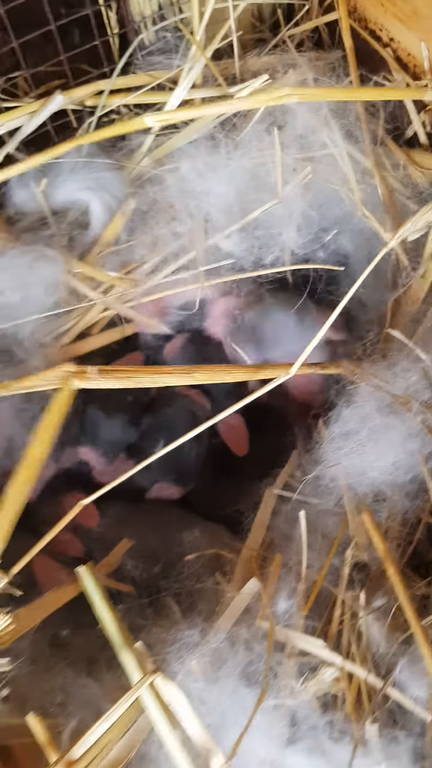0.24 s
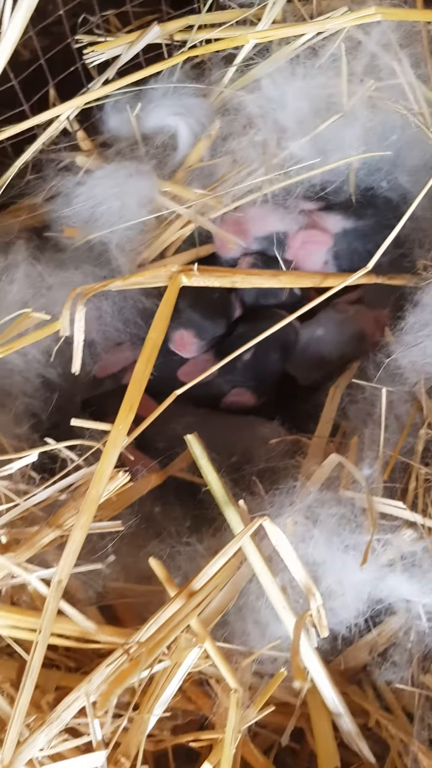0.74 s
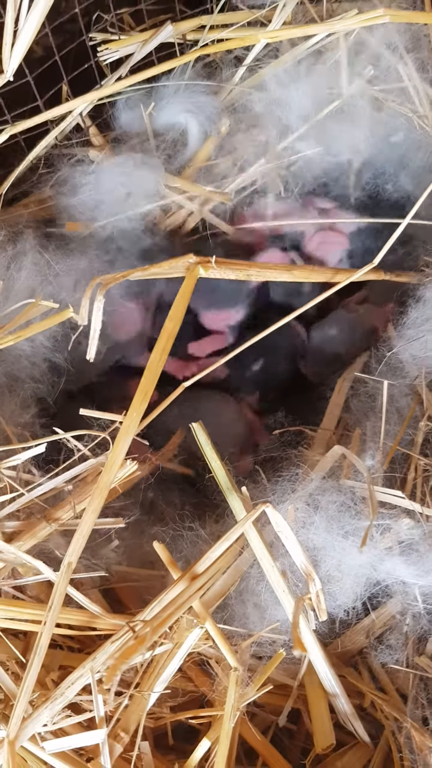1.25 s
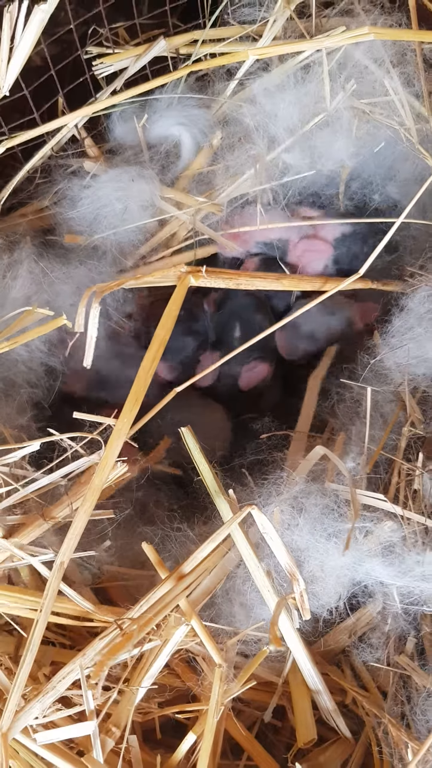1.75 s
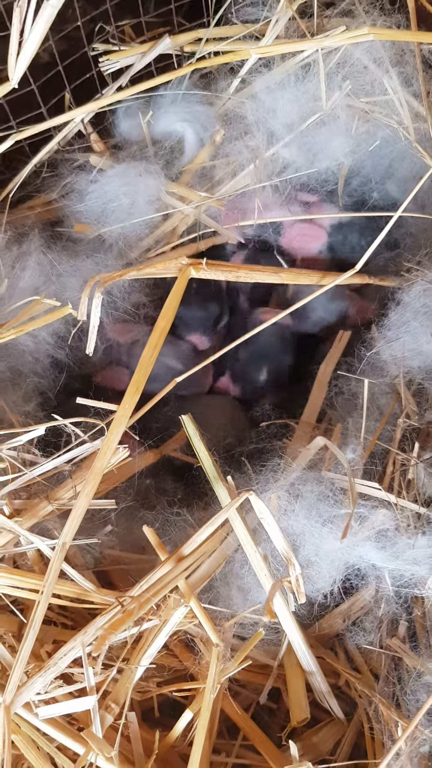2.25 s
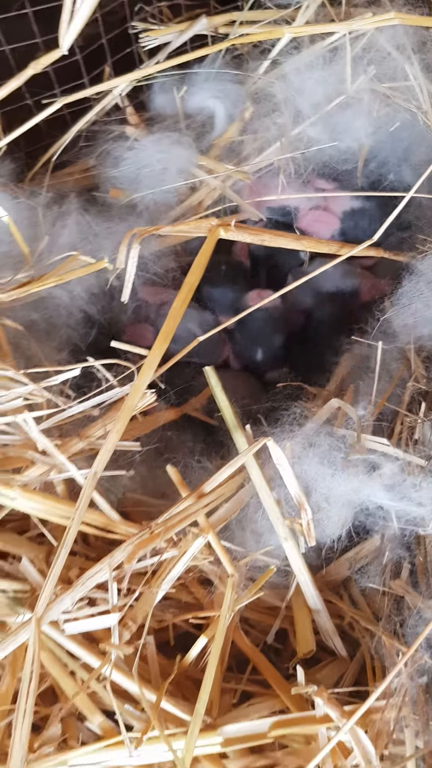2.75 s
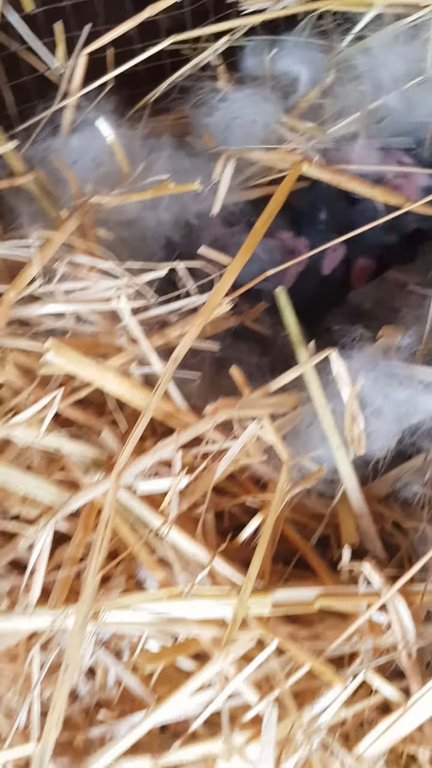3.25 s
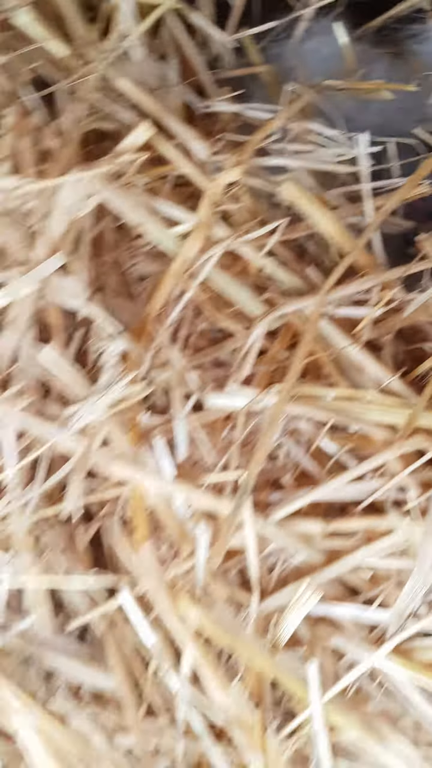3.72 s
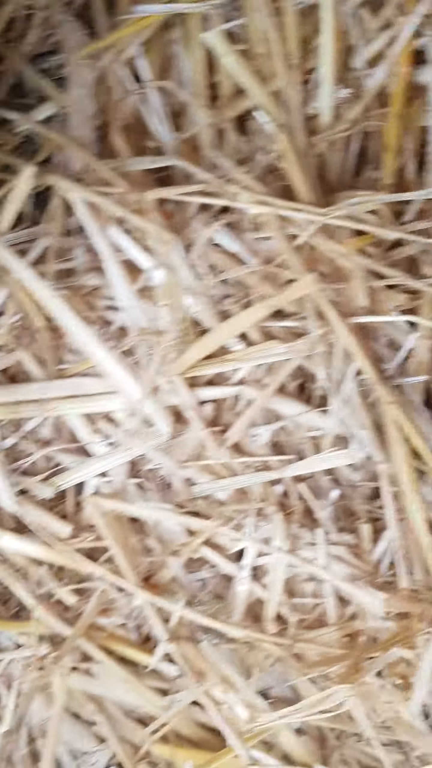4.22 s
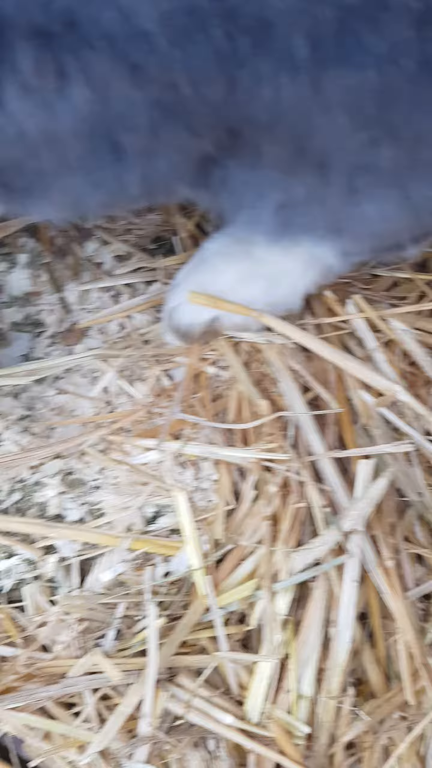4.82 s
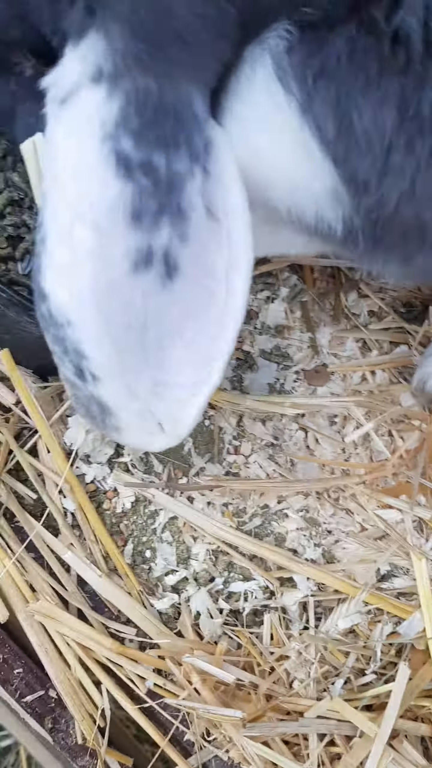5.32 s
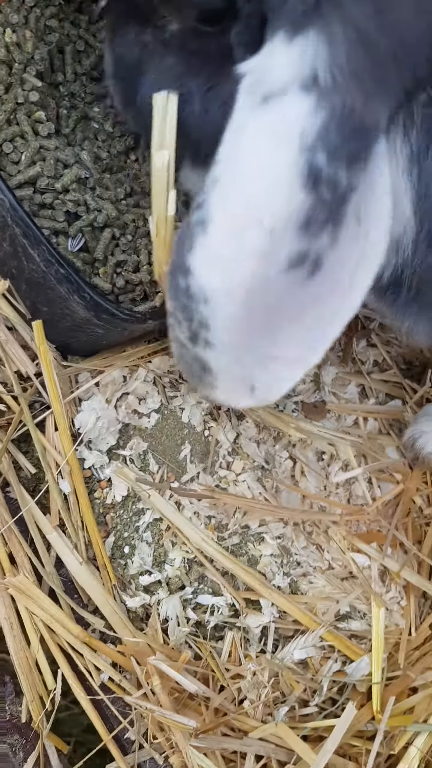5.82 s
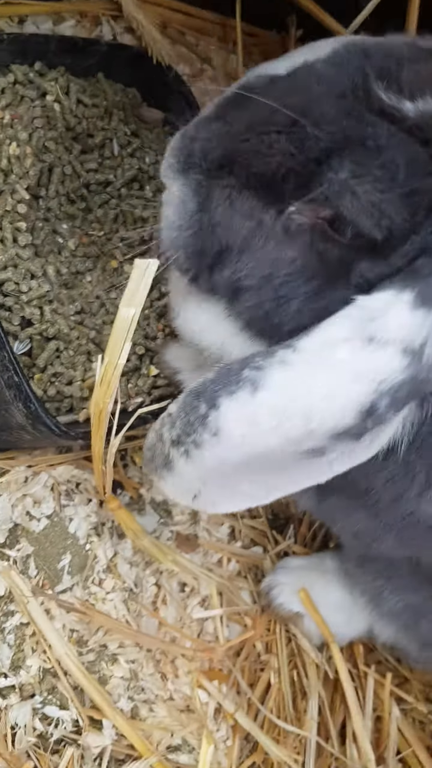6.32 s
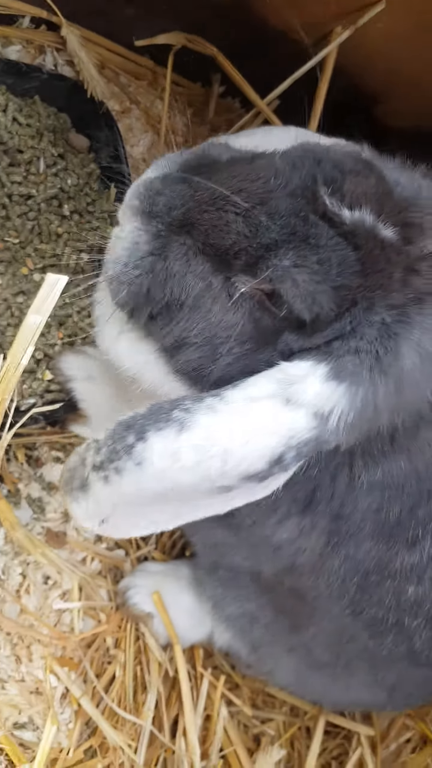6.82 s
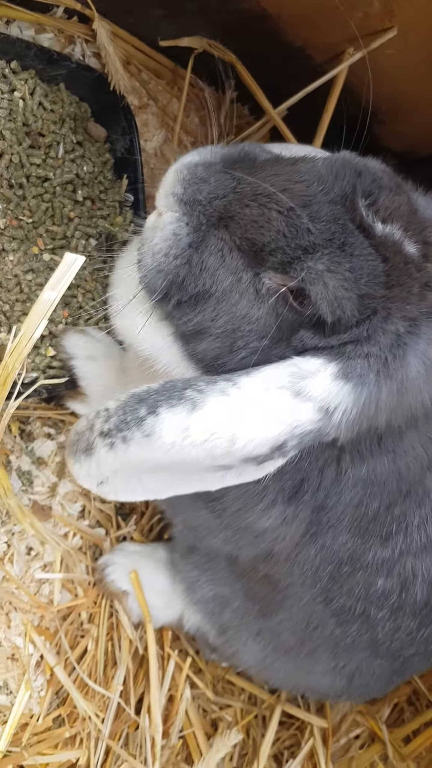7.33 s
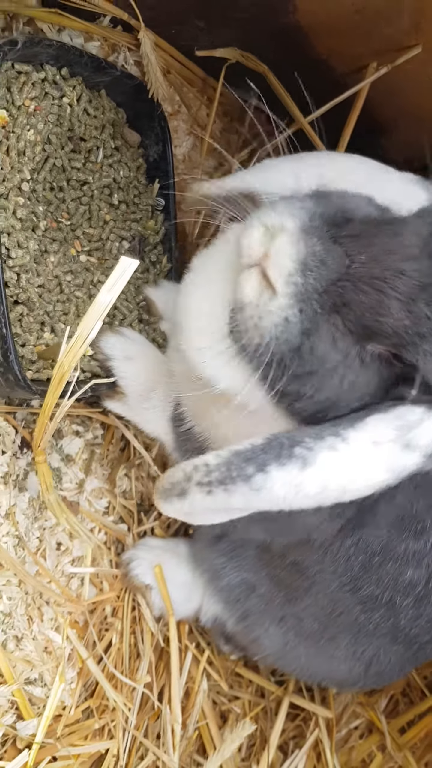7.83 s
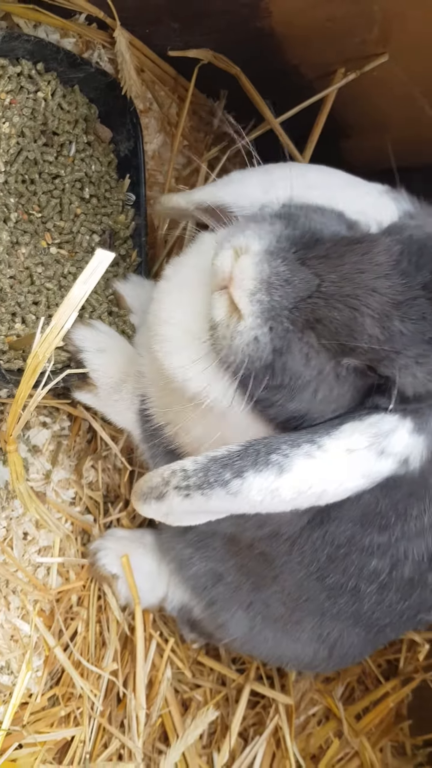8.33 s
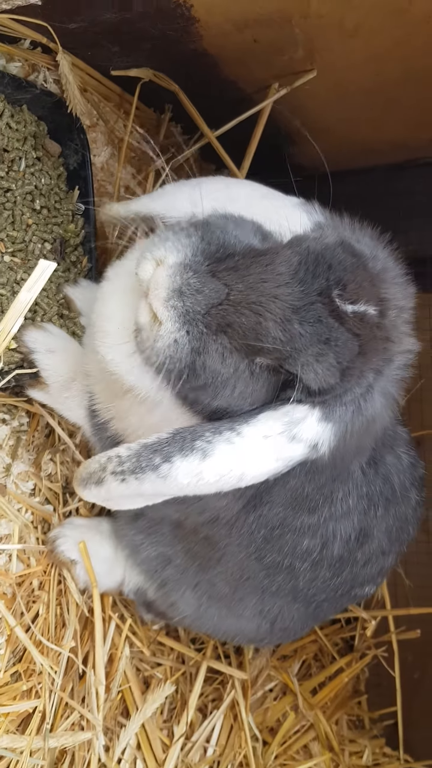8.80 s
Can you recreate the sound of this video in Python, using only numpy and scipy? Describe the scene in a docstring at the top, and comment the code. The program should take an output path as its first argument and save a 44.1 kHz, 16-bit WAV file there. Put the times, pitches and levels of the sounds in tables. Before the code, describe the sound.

Outdoors by a wooden hutch, a hen whines and croons hoarsely a little way off, between soft clucks. Dry straw slides and snaps close to the microphone, and the boards give a few dull bumps and scuffs. Then a nearer hen draws out one long, cracking call followed by five short ones. Faint clucks and scuffs end it, over a low rumble.

```python
"""Hens call round a straw-filled rabbit hutch outdoors, over a low rumble. First one whines and croons
a little way off, between soft clucks. Then straw slides and snaps, and the hutch boards ring dully
with bumps and scuffs. After five seconds a nearer hen draws out a long breaking call and five short
ones; faint clucks and scuffs close the scene. Each voice is a syrinx tone with overtones coloured by
the throat, roughened by puffs of turbulent breath."""
import sys
import numpy as np
from scipy import signal
from scipy.io import wavfile

SR = 44100
rng = np.random.default_rng(int(sys.argv[2]) if len(sys.argv) > 2 else 0)


def master(y):
    """Save y as 16-bit WAV."""
    cut = np.clip(np.atleast_2d(y).T, -1, 1)
    pcm = np.round(cut * 32767)  # scale
    wavfile.write(sys.argv[1], SR, pcm.astype(np.int16))


N = 399546
TIME = np.arange(N) / SR

# the near hen's long call, swelling and opening: (time [s], pitch [Hz], fundamental [dB], octave [dB])
NEAR_LONG_CALL = [(5.235, 601, -48, -56), (5.257, 565.4, -45.5, -38), (5.285, 498, -45, -51),
                  (5.32, 614, -43, -48), (5.4, 590, -35, -47), (5.6, 629, -36, -36.5),
                  (5.75, 640, -35.5, -35.5), (5.9, 641, -32, -32), (6.08, 646.6, -34.5, -32.5),
                  (6.12, 661, -34.5, -28), (6.34, 674.4, -32, -24.5), (6.378, 581, -52, -42)]
# her short calls: (start [s], length [s], pitch [Hz], fundamental [dB], octave [dB],
# octave swell [dB/s], overshoot [Hz], final flick [Hz])
NEAR_SHORT_CALLS = [(6.486, .21, 648, -36.5, -30, 28, 3.9, 24.6),
                    (6.818, 0.2, 613.6, -36, -33.5, 18, 17, 85),
                    (7.143, 0.18, 597, -35.5, -31.5, 11, 17.6, 85),
                    (7.449, 0.178, 601, -36.5, -31, 2, 22.2, 42),
                    (7.77, 0.19, 608.3, -39.5, -33, 24, 30, 31.6)]
# her voice cracks into a higher register:
# (centre [s], length [s], rise [share of pitch], fundamental change [dB], octave change [dB])
REGISTER_CRACKS = [(5.373, 0.033, 0.35, -15, -10), (5.431, 0.017, 0.31, -17, -3),
                   (5.487, 0.021, 0.1, -1, 1), (5.541, 0.027, 0.21, -11, -4), (5.67, 0.019, 0.13, -2, 1),
                   (5.72, 0.0081, 0.13, 2, 2), (5.785, 0.012, 0.17, -4.5, -3), (5.824, 0.03, .145, -1.5, 3),
                   (5.87, 0.04, 0.15, -5, 6.5), (5.933, 0.023, .14, -6, -1.5),
                   (6.034, 0.01477, 0.128, -3, 2), (6.357, 0.009, 0.25, 3, -4.5),
                   (6.517, 0.0089, 0.11, 1.5, 0), (6.628, 0.0027, 0.13, -6.5, -2),
                   (6.934, 0.011, 0.12, -3, 0.5)]
# she bears down in pushes: (centre [s], length [s], strength [factor])
VOICE_PRESSES = [(5.908, 0.0347, 1.52), (5.959, 0.028, 0.56), (6.004, 0.051, 1.71), (6.065, 0.0494, 0.9),
                 (6.145, 0.05, 0.45), (6.536, 0.042, 0.77), (6.654, 0.022, 0.58), (6.672, 0.018, 1.77),
                 (6.847, 0.025, 1), (6.982, 0.044, 1.24), (7.189, 0.029, 1.13), (7.3, 0.034, 0.53),
                 (7.516, 0.044, 1.3), (7.579, 0.039, 0.92), (7.784, 0.018, 1.4), (7.837, 0.036, 0.85),
                 (7.918, 0.053, 0.54)]
# her pitch flutters: (centre [s], length [s])
PITCH_FLUTTERS = [(5.76, 0.18), (6.255, 0.087), (6.587, 0.018)]
# she is hoarse until she finds her register: (time [s], extra rasp [dB])
NEAR_HOARSENESS = [(5.3, 5), (5.55, 10), (5.78, 10), (5.89, -2.5), (6.3, 2), (7.3, 2.5), (7.8, 4)]
# hoarse croons: (start [s], length [s], pitch [Hz], fundamental [dB], octave [dB])
HOARSE_CROONS = [(0.45, 0.17, 641, -46.5, -54.5), (0.695, 0.19, 678.5, -44.5, -53),
                 (1.007, .192, 662.5, -44, -53.5), (1.395, 0.24, 682, -43.5, -51.5)]
# thin whines and squeaks, one curve a call: (time [s], pitch [Hz], fundamental [dB], octave [dB])
THIN_WHINES = [
    [(0, 867, -41.5, -45), (.035, 886, -44.5, -49), (.06, 1007, -56, -55), (.09, 980, -53, -70)],
    [(.19, 936, -52, -59), (.255, 999, -50, -60), (.277, 767, -52, -42), (.304, 703, -36, -41.5),
     (.318, 790, -74, -40), (.335, 744, -55, -81)],
    [(.445, 1150, -53, -70), (.475, 1071, -55, -81), (.495, 940, -56, -48), (.53, 722, -46, -57)],
    [(.568, 796, -62, -52), (.583, 736, -44, -45.5), (.6, 765, -67, -70)],
    [(1.922, 596, -76, -52), (1.95, 635, -72, -39.5), (1.972, 653, -64, -57), (1.995, 631, -73, -42.5),
     (2.08, 648, -69, -39.5), (2.16, 621.5, -61, -36), (2.2, 612, -52, -43.5), (2.212, 599, -46, -50),
     (2.228, 589, -52, -36), (2.27, 572, -50, -41), (2.285, 547, -68, -54)],
]
# soft clucks: (start [s], length [s], pitch [Hz], glide [Hz], fundamental [dB], octave [dB])
SOFT_CLUCKS = [(0.163, 0.034, 649, 3, -35.5, -52), (1.222, 0.041, 647, -64, -57.5, -69),
               (1.959, 0.045, 678, -35, -51.5, -54.5), (2.315, 0.02, 664, -30, -52, -69),
               (3.181, 0.035, 810, 105, -45, -69), (3.23, 0.031, 798, -250, -63, -60),
               (8.292, 0.036, 607, 63, -55.5, -70), (8.331, .04, 579, -43, -53, -66),
               (8.701, 0.054, 708, 0, -55, -76), (8.901, 0.055, 560, 115, -55, -69),
               (8.951, 0.068, 692, -85, -54, -72)]
# throat colour of each voice: (frequency [Hz], overtone level against the tone's body [dB])
NEAR_OVERTONES = [(1300, -9.5), (1850, -13.5), (2100, -18), (2350, -31.5), (2650, -28), (3100, -34),
                  (3500, -41.5), (3900, -26.5), (4400, -42), (5600, -51.5), (6500, -44), (8000, -77)]
CROON_OVERTONES = [(1300, -30), (1750, -1.5), (2020, -9), (2300, -42), (3000, -28), (4100, -34),
                   (6000, -45)]
WHINE_OVERTONES = [(1300, -10), (1850, -34), (2400, -27), (2800, -38), (4200, -49), (6000, -60)]
# where each voice stands: (time [s], left lag [ms], left over right at the octave [dB])
NEAR_PAN = [(5.3, 0.37, -1.5), (6.03, 0.32, -3.5), (6.3, 0.28, -6.5), (6.6, 0.21, -7), (6.9, 0.19, -4.5),
            (7.55, 0.12, -4.5), (7.9, 0.11, -5)]
CROON_PAN = [(.5, -0.24, -2), (1.6, -0.2, -0.5)]
WHINE_PAN = [(0, 0.11, 0), (.3, 0.11, -2), (2.03, 0.27, 10), (2.16, 0.35, -5), (2.24, 0.15, -3)]
# straw is stirred: (start [s], length [s], crisp treble [dB], duller rustle [dB])
STRAW_STIRS = [(0, 0.072, -42, -46), (0.06, 0.022, -40, -45), (.17, 0.13, -49.5, -54.5),
               (0.35, 0.16, -58.5, -63), (0.81, 0.028, -59.5, -61.5), (1.145, 0.11, -54, -61),
               (1.334, 0.48, -60, -63.5), (1.73, 0.054, -64, -65), (2.023, 0.27, -63, -66.5),
               (2.846, 0.52, -52, -55.5), (3.528, 0.072, -50.5, -45.5), (3.645, 0.042, -42, -45.5),
               (3.784, 0.15, -51.5, -52.5), (3.98, 0.51, -64, -63.5), (4.314, 0.4, -57, -57),
               (4.763, 0.41, -59, -60), (5.305, 0.49, -52, -51), (5.893, 0.021, -56, -53),
               (6.215, 0.053, -59, -53), (6.76, 0.26, -71, -64.5), (7.246, 0.096, -67, -60),
               (7.472, 0.3, -66, -60.5), (7.846, 0.21, -60, -57), (8.102, 0.05, -70, -67),
               (8.537, 0.33, -63, -64), (8.818, 0.13, -60, -58)]
# the straw's two colours: (frequency [Hz], relative density [dB])
CRISP_SPECTRUM = [(5000, -15), (7500, -11.5), (9000, -8), (12000, 0.5), (16000, -4.5)]
RUSTLE_SPECTRUM = [(1200, 2), (2200, 1), (3300, -4), (4500, -1), (7000, -1), (8500, -23.5), (11000, -28.5)]
# single stalks snap: (time [s], treble before trim [dB], middle band before trim [dB], decay [s])
STALK_SNAPS = [(0.078, -24, -41, 0.039), (0.144, -36, -59, .005), (0.164, -32, -44, 0.0046),
               (0.255, -36, -50, 0.0051), (0.823, -29, -52, .004), (1.166, -34.5, -60, 0.0035),
               (1.216, -32.5, -51, 0.015), (1.609, -38, -54, .003), (1.763, -28, -47, 0.0033),
               (1.846, -36, -52, 0.0022), (1.917, -40, -61, 0.0025), (2.925, -38, -66, .003),
               (3.036, -32, -53, 0.0051), (3.216, -34, -47.5, 0.039), (3.386, -41, -43, 0.016),
               (3.403, -31, -45, 0.011), (3.527, -26, -39, 0.0091), (3.6567, -20, -35, .003),
               (3.8764, -18.5, -49, 0.0022), (3.89, -42, -59, .003), (4.605, -54, -50, 0.0038),
               (4.971, -42, -53.5, .002), (5.337, -30.5, -43.5, 0.029), (8.04, -49, -61, 0.0024),
               (8.08, -46, -60, .002), (8.191, -45, -57, 0.0018), (8.207, -52, -61, .001),
               (8.242, -55, -66, .001), (8.894, -50, -56, .003)]
# bumps and scuffs on the hutch: (start [s], length [s], resonance [Hz], level [dB])
HUTCH_BUMPS = [(0.142, 0.092, 690, -43), (1.417, 0.091, 338, -48), (2.954, 0.058, 386, -44.5),
               (2.959, 0.053, 670, -54), (3.183, 0.017, 750, -46.5), (3.238, 0.046, 716, -46),
               (3.379, 0.053, 2060, -48.5), (3.489, 0.19, 1730, -47), (3.516, 0.21, 400, -50.5),
               (3.602, 0.063, 413, -46.5), (3.654, 0.019, 2090, -42.5), (3.654, 0.017, 1300, -44),
               (3.655, 0.034, 730, -51), (3.717, 0.086, 510, -50.5), (4.602, 0.015, 1780, -50),
               (4.603, 0.012, 504, -46), (5.128, 0.0057, 605, -48), (5.129, 0.005, 1150, -53),
               (5.3, 0.0066, 880, -44), (5.986, 0.0047, 870, -38.5), (8.661, 0.14, 504, -55),
               (8.9, 0.17, 590, -54), (8.893, 0.14, 2290, -57.5)]
# colours of the low bed and the far-off hiss: (frequency [Hz], relative density [dB])
LOW_SPECTRUM = [(22, -52), (32, -17), (41, -4), (51, 7.5), (63, -8), (82, 0), (115, -14.5), (150, -10),
                (185, -7), (240, -16), (330, -19.5), (430, -20), (650, -3)]
AIR_SPECTRUM = [(450, -4.5), (620, -7), (820, 2), (1050, 6.5), (1400, 4), (1900, -0.5), (2400, -5),
                (3100, -19), (6000, -58)]
# fader rides for rumble, drone and hiss: (time [s], level [dB])
RUMBLE_FADER = [(0, -44.5), (1.2, -44), (1.8, -45), (2.7, -45), (3.1, -42.5), (3.6, -36.5), (4.0, -47.5),
                (4.7, -44.5), (5.2, -48), (5.8, -45.5), (6.5, -44), (7.2, -49), (7.6, -46), (8.3, -51.5),
                (9.06, -43.5)]
DRONE_FADER = [(0, -52), (2.4, -53.5), (3.0, -48.5), (3.6, -45), (4.0, -48.5), (5.8, -44.5), (7.0, -48),
               (9.06, -49.5)]
AIR_FADER = [(0, -58), (1.0, -56), (2.5, -55), (3.5, -53.5), (4.5, -53.5), (6, -54.5), (7.1, -54),
             (8.3, -55.5), (9.06, -53.5)]
# stereo image of straw and background: (frequency [Hz], left-right correlation [0 to 1])
STEREO_LIKENESS = [(50, 0.96), (150, 0.99), (300, 0.8), (700, 0.0025), (1400, 0), (3000, 0.0053),
                   (15000, 0)]


def hen(calls, throat, place, half_db, half_tilt_db, jitter, shimmer_db, rasp_db, shadow_db,
        fundamental_share=0, onset_rasp_db=0, scratch=0, press_db=0, hoarseness=((0, 0),),
        edge_s=0.00057):
    """A syrinx tone with overtones; alternate cycles differ, which puts half harmonics between them."""
    smear_cycles, patchy_db, settle_s = .021, 3, .018
    out = np.zeros((2, N))
    for t, pitch, first_db, octave_db in calls:
        lag_ms, balance_db = in_time(place, t)
        pitch = pitch * (1 + jitter * drift(900, len(t)))
        cycles = np.cumsum(pitch) / SR
        left_lag_cycles = np.array([[1], [0]]) * pitch.mean() * lag_ms / 1000
        doubling_db = half_db + 3 * drift(25.1, len(t))
        body_db = octave_db + fundamental_share * (first_db - octave_db) + press_db * pressing(t)
        voice = 0
        for k in np.arange(2, 23) / 2:
            level_db = first_db if k == 1 else octave_db if k <= 2 else body_db + at_hz(throat, k * pitch)
            if k % 1:   # half harmonics tilt with height, up to a limit
                level_db = level_db + np.minimum(doubling_db + half_tilt_db * (k - 2), half_db / 3)
            # low partials come direct, delayed and shaded at the left; the top ones scatter
            direct = k < 4
            ears = panned(balance_db - shadow_db * np.log2(k / 2) if direct else balance_db / 2)
            phase = k * cycles - left_lag_cycles * (min(k, 2) if direct else 1)
            if k > 2:   # overtones lose step, and come and go
                phase = phase + smear_cycles * (k - 2) * drift(220, len(t))
                level_db = level_db + patchy_db * drift(34.28, len(t))
            shimmer_share = .6 if k == 1 else 1   # the fundamental stays firmer
            gain = from_db(level_db + shimmer_db * shimmer_share * drift(140, len(t)))
            voice = voice + np.sqrt(2) * gain * ears * np.sin(2 * np.pi * phase)
        # turbulence leaves the syrinx in puffs, one a cycle
        puffs = rng.standard_normal((2, len(t))) * (1 + np.cos(2 * np.pi * cycles))
        grit = scratch * band(puffs, 2100, 3200) + 0.045 * band(puffs, 4200, 4700)
        rasp = rms_one(band(puffs, 770, 1750, order=4) + grit)
        unsettled_db = onset_rasp_db * np.exp(-(t - t[0]) / settle_s)
        voice = voice + rasp * from_db(octave_db + rasp_db + unsettled_db + in_time(hoarseness, t)[0])
        fade = np.clip(np.minimum(t - t[0], t[-1] - t) / edge_s, 0, 1)
        add(out, t[0], voice * fade)
    return out


def glide(curve):
    """A freely gliding call: (time [s], pitch [Hz], fundamental [dB], octave [dB])."""
    t = np.arange(curve[0][0], curve[-1][0], 1 / SR)
    return (t, *in_time(curve, t))


def short_call(s, length, hz, first_db, octave_db, swell_db_per_s, overshoot_hz, flick_hz):
    """The pitch scoops up, overshoots, climbs as the octave swells, and ends on an upward flick."""
    climb_hz_per_s, wavers_per_s = 128.5, 70
    age = np.arange(0, length, 1 / SR)
    past_middle, remaining = age - length / 2, length - age
    scoop_hz = 60.4 * np.exp(-age / 0.01153)
    overshoot = overshoot_hz * np.exp(-((age - .032) / 0.0133) ** 2)
    flick = flick_hz * np.exp(-remaining / 0.0076)
    pitch = hz - scoop_hz + overshoot + climb_hz_per_s * past_middle + flick
    edges_db = -8.5 * np.exp(-age / 0.0042) - 6.5 * np.exp(-remaining / 0.006)
    swell_db = swell_db_per_s * past_middle + 1.6 * drift(wavers_per_s, len(age))
    pitch = pitch * (1 + 0.0078 * drift(wavers_per_s, len(age)))
    # the flick pushes the octave while the fundamental gives way
    first_db, octave_db = first_db - 0.14 * flick, octave_db + 0.0687 * flick
    return s + age, pitch, first_db + edges_db, octave_db + edges_db + swell_db


def cracked(t, pitch, first_db, octave_db):
    """Pressing flattens and strengthens the tone; a crack throws it upward; a flutter shakes it."""
    sag_share, push_db, flutter_share, flutter_hz = .018, 3, 0.04, 60
    press = pressing(t)
    pitch, octave_db = pitch * (1 - sag_share * press), octave_db + push_db * press
    for s, length, rise, first_change_db, octave_change_db in REGISTER_CRACKS:
        inside = during(t, s, length)
        pitch = pitch * (1 + rise * inside)
        first_db, octave_db = first_db + first_change_db * inside, octave_db + octave_change_db * inside
    shaking = sum(during(t, s, length) for s, length in PITCH_FLUTTERS)
    flutter = flutter_share * shaking * np.sin(2 * np.pi * flutter_hz * t)
    return t, pitch * (1 + flutter), first_db, octave_db


def pressing(t):
    """How hard the near hen bears down on her voice."""
    return sum(strength * during(t, s, length) for s, length, strength in VOICE_PRESSES)


def croon_call(s, length, hz, first_db, octave_db):
    """A raspy catch in the throat, joined by a soft tone that climbs; both fade together."""
    climb_hz_per_s, catch_hz, catch_db, catch_s = 299, 20.5, 9.5, 0.019
    attack_s, release_s, fade_db = 0.023, 0.024, 31
    age = np.arange(0, length, 1 / SR)
    catch = np.exp(-age / catch_s)
    pitch = hz + climb_hz_per_s * (age - length / 2) + catch_hz * catch
    attack_db = -fade_db * np.maximum(1 - age / attack_s, 0)
    release_db = -fade_db * np.maximum(1 - (length - age) / release_s, 0)
    return s + age, pitch, first_db + attack_db + release_db, octave_db + release_db + catch_db * catch


def cluck_call(s, length, hz, glide_hz, first_db, octave_db):
    """One soft gulp of tone that swells and dies while its pitch slides."""
    age = np.arange(0, length, 1 / SR)
    arch_db = -6 * (2 * age / length - 1) ** 2
    return s + age, hz + glide_hz * (age / length - .5), first_db + arch_db, octave_db + arch_db


def straw():
    """Dry stalks slide over each other in small surges."""
    crisp_db, rustle_db = stirring(TIME)
    surge_db = 1.3 * drift(45)
    grains = crackle(per_s=1100, spread_db=3.2, hiss=.75)
    crisp = from_db(crisp_db + surge_db) * coloured(CRISP_SPECTRUM, grains)
    rustle = from_db(rustle_db + surge_db) * coloured(RUSTLE_SPECTRUM, grains)
    return (crisp + rustle) * panned(-0.45)


def stirring(t):
    """Crisp and rustle levels in dB: each stir builds, holds and settles."""
    attack_s, release_s = 0.076, 0.14
    grid = TIME[::64]
    gains = from_db([[-73], [-72]])   # the straw is never quite still
    for s, length, crisp_db, rustle_db in STRAW_STIRS:
        before, after = np.maximum(s - grid, 0), np.maximum(grid - s - length, 0)
        envelope = np.exp(-before / attack_s - after / release_s)
        gains = np.maximum(gains, from_db([[crisp_db], [rustle_db]]) * envelope)
    return [np.interp(t, grid, 20 * np.log10(gain)) for gain in gains]


def crackle(per_s, spread_db, hiss):
    """Countless tiny stalk contacts of uneven size over a smooth sliding hiss."""
    contacts = rng.random((2, 1, N)) < per_s / SR
    sizes = from_db(spread_db * np.minimum(rng.exponential(1, (2, 1, N)), 4))
    ticks = rms_one(contacts * sizes * rng.standard_normal((2, 2, N)))
    return ticks + hiss * rng.standard_normal((2, 2, N))


def snaps(rise_share, splinter_s, splinter_db, treble_trim_db, middle_trim_db):
    """A stalk gives with a sharp crack or a slower crunch, then splinters briefly."""
    out, t = np.zeros((2, N)), TIME[:SR // 12]
    for s, treble_db, middle_db, decay_s in STALK_SNAPS + small_snaps(count=14, decay_s=.002):
        splinters = from_db(splinter_db + 3.8 * drift(320, len(t))) * np.exp(-t / splinter_s)
        attack = 1 - np.exp(-t / (rise_share * decay_s))
        burst = rng.standard_normal((2, len(t))) * (np.exp(-t / decay_s) + splinters) * attack
        treble = from_db(treble_db + treble_trim_db) * band(burst, 8600, 21000)
        middle = from_db(middle_db + middle_trim_db) * band(burst, 3760, 9760)
        add(out, s, treble + middle)
    return out


def small_snaps(count, decay_s):
    """Lesser snaps fall at random, louder where the straw is stirred harder."""
    s = rng.random(count) * TIME[-1]
    crisp_db, rustle_db = stirring(s)
    return list(zip(s, crisp_db + 16.5, rustle_db + 2, np.full(count, decay_s)))


def bumps(width_hz, body_db):
    """Each bump is a short run of uneven contacts that sets a damped board sounding."""
    out, t = np.zeros((2, N)), TIME[:SR // 4]
    for s, length, hz, level_db in HUTCH_BUMPS:
        push = np.clip(t / 0.0043, 0, 1) * np.clip(2 * (1 - t / length), 0, 1)
        force = push * from_db(1.5 * drift(170, len(t)))
        contacts = force * (rng.standard_normal(len(t)) + 0.8 * rng.standard_normal((2, len(t))))
        ring = resonate(resonate(contacts, hz, width_hz), hz, 2 * width_hz)
        body = from_db(body_db) * band(contacts, 310, 1930)
        add(out, s, from_db(level_db) * rms_one(ring + body) * np.sqrt(length / t[-1]))
    return out


def hutch_echo(x, t60, wet_db):
    """Dense, quickly dying reflections from the hutch walls and the yard."""
    t = TIME[:SR // 2]
    tail = band(rng.standard_normal((2, len(t))), 540, 2100) * from_db(-60 * t / t60) * (t > .004)
    tail = tail / np.sqrt(np.sum(tail ** 2, axis=1, keepdims=True))
    return x + from_db(wet_db) * signal.fftconvolve(x, tail, axes=1)[:, :N]


def outdoors():
    """The bed: a low rumble, a drone above it and a far-off hiss."""
    low = coloured(LOW_SPECTRUM, rng.standard_normal((2, 2, N)))
    hiss = coloured(AIR_SPECTRUM, rng.standard_normal((2, 2, N)))
    rumble = from_db(in_time(RUMBLE_FADER)[0]) * rms_one(band(low, 34.0, 109.7, order=4))
    drone = from_db(in_time(DRONE_FADER)[0]) * rms_one(band(low, 126.3, 371.4, order=4))
    air = from_db(in_time(AIR_FADER)[0]) * rms_one(band(hiss, 672, 2910, order=5))
    return (rumble + drone) * panned(1.8) + air * panned(.8)


def coloured(spectrum, source):
    """Two unrelated stereo sources take turns in a filter bank; the bass is centred, the top wide."""
    low, high = spectrum[0][0], spectrum[-1][0]
    edges = np.geomspace(low, high * np.sqrt(4 / 3), 2 * len(spectrum) + 1)
    out = 0
    for k, (low_hz, high_hz) in enumerate(zip(edges, edges[1:])):
        hz = np.sqrt(low_hz * high_hz)
        pair = band(source[k % 2], low_hz, high_hz)
        blend = np.arcsin(at_hz(STEREO_LIKENESS, hz)) / 2
        out = out + from_db(at_hz(spectrum, hz)) * (np.cos(blend) * pair + np.sin(blend) * pair[::-1])
    return rms_one(out)


def from_db(db):
    """Decibels to gain."""
    return 10 ** (np.asarray(db) / 20)


def rms_one(x):
    """Scale to unit power."""
    return x / np.sqrt(np.mean(x ** 2) + 1e-20)


def in_time(rows, t=TIME):
    """Each column of a curve, joined by straight lines."""
    s, *columns = np.transpose(rows)
    return [np.interp(t, s, c) for c in columns]


def at_hz(points, hz):
    """Read a spectrum on a log-frequency axis."""
    f, value = np.transpose(points)
    return np.interp(np.log(hz), np.log(f), value)


def during(t, s, length):
    """A soft-edged window centred on s."""
    return np.exp(-(2 * (t - s) / length) ** 4)


def drift(rate, size=N):
    """Smooth random wander of spread 1, with `rate` new values a second."""
    knots = rng.standard_normal(size // 8 + 2)
    return np.interp(np.arange(size) * rate / SR, np.arange(len(knots)), knots) * np.sqrt(3 / 2)


def band(x, low_hz, high_hz, order=2):
    """Flat-topped band-pass."""
    sos = signal.butter(order, [low_hz, min(high_hz, SR * 15 / 32)], "band", fs=SR, output="sos")
    return signal.sosfilt(sos, x + 1e-18)


def resonate(x, hz, width_hz):
    """One resonance with gain 1 at its peak."""
    r = np.exp(-np.pi * width_hz / SR)
    feedback = [1, -2 * r * np.cos(2 * np.pi * hz / SR), r * r]
    return signal.lfilter(np.array([1, 0, -1]) * (1 - r * r) / 2, feedback, x)


def panned(balance_db):
    """Left and right gains of equal total power."""
    gains = from_db(np.array([[1], [-1]]) * balance_db / 2)
    return gains / np.sqrt(np.mean(gains ** 2, axis=0))


def add(out, s, sound):
    """Mix a stereo sound in at time s."""
    i = max(round(s * SR), 0)
    out[:, i:i + sound.shape[1]] += sound[:, :max(N - i, 0)]


def scene():
    """The near hen in front, farther calls and bumps a little wetter, dry straw, the outdoor bed."""
    near_calls = [glide(NEAR_LONG_CALL)] + [short_call(*row) for row in NEAR_SHORT_CALLS]
    near = hen([cracked(*call) for call in near_calls], NEAR_OVERTONES, NEAR_PAN,
               half_db=-21.5, half_tilt_db=4.5, jitter=.007, shimmer_db=.8, rasp_db=-24, shadow_db=5.5,
               fundamental_share=.5, onset_rasp_db=16.5, scratch=.17, press_db=2.5,
               hoarseness=NEAR_HOARSENESS)
    croon = hen([croon_call(*row) for row in HOARSE_CROONS], CROON_OVERTONES, CROON_PAN,
                half_db=-2.5, half_tilt_db=0, jitter=.017, shimmer_db=2.8, rasp_db=-4.5, shadow_db=2,
                onset_rasp_db=4, edge_s=.008)
    cluck = hen([cluck_call(*row) for row in SOFT_CLUCKS], CROON_OVERTONES, CROON_PAN,
                half_db=-6, half_tilt_db=0, jitter=.06, shimmer_db=3, rasp_db=0, shadow_db=2)
    whine = hen([glide(curve) for curve in THIN_WHINES], WHINE_OVERTONES, WHINE_PAN,
                half_db=-21.5, half_tilt_db=-0.5, jitter=0.012, shimmer_db=3, rasp_db=-17, shadow_db=3,
                edge_s=0.0024)
    farther = hutch_echo(croon + cluck + whine + bumps(width_hz=270, body_db=-12), t60=0.16, wet_db=-20)
    stalks = straw() + snaps(rise_share=0.3, splinter_s=0.019, splinter_db=-6,
                             treble_trim_db=-4.5, middle_trim_db=10)
    return hutch_echo(near, t60=0.087, wet_db=-23.5) + farther + stalks + outdoors()


def record(dry):
    """A steep high cut at 16.1 kHz."""
    return signal.sosfilt(signal.ellip(10, .1, 80, 16100, fs=SR, output="sos"), dry)


dry = scene()
out = record(dry)
master(out)
```